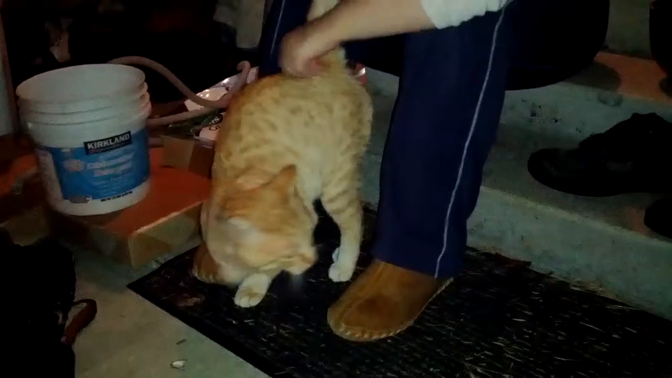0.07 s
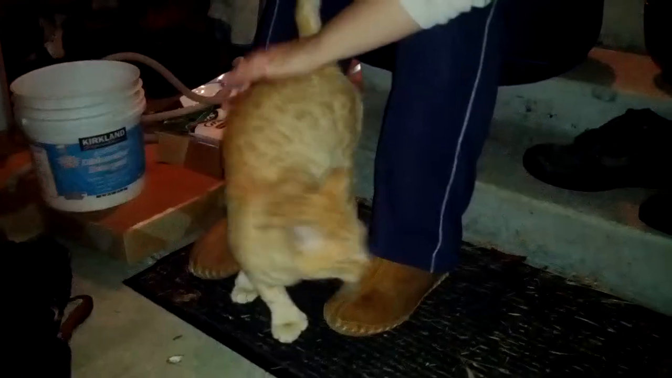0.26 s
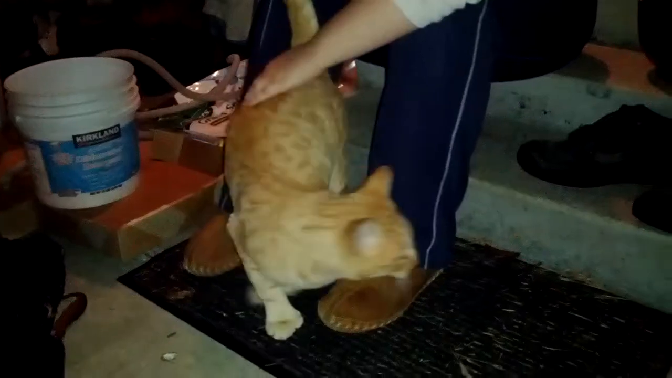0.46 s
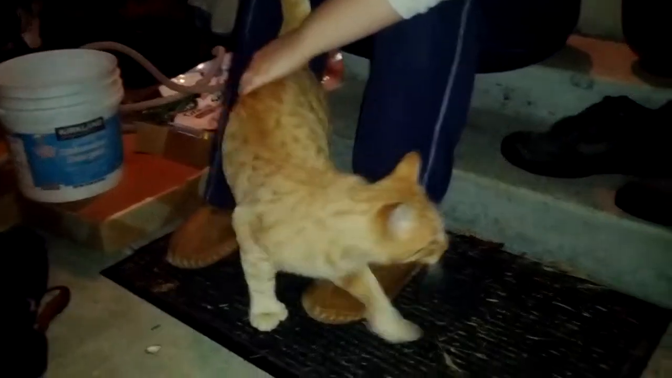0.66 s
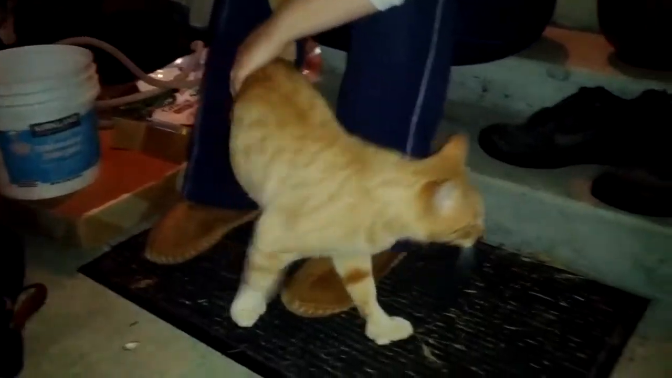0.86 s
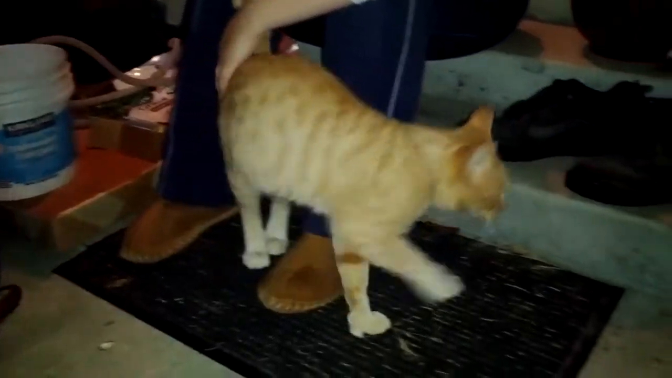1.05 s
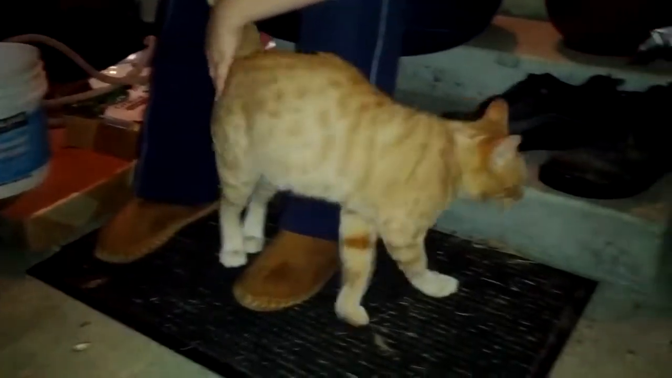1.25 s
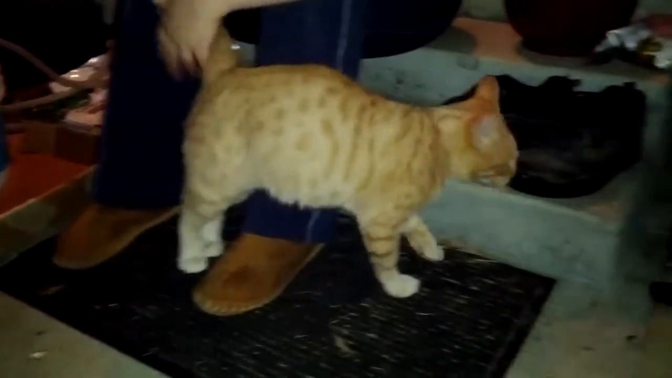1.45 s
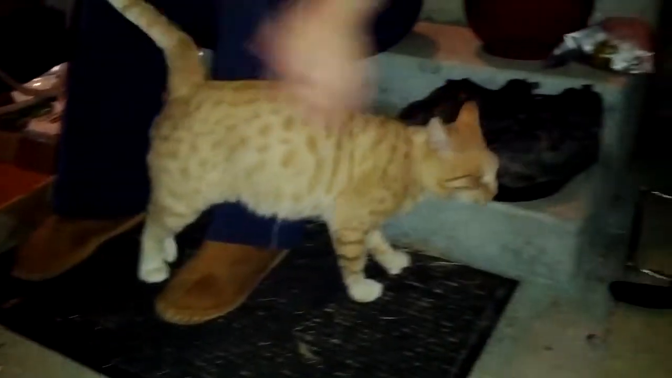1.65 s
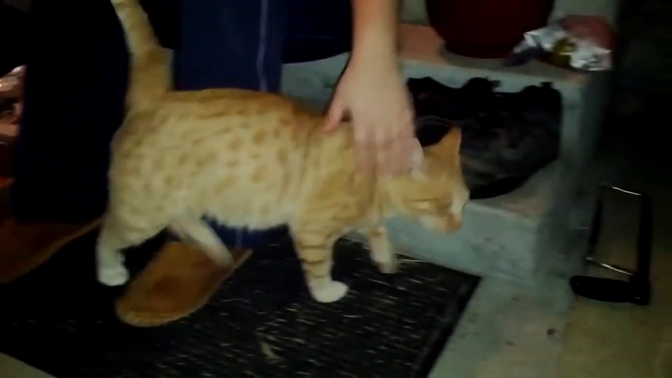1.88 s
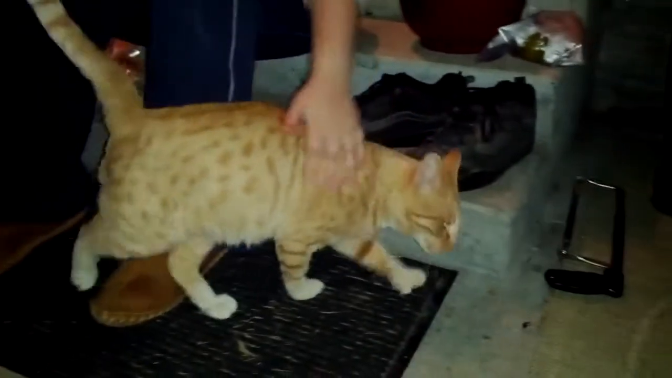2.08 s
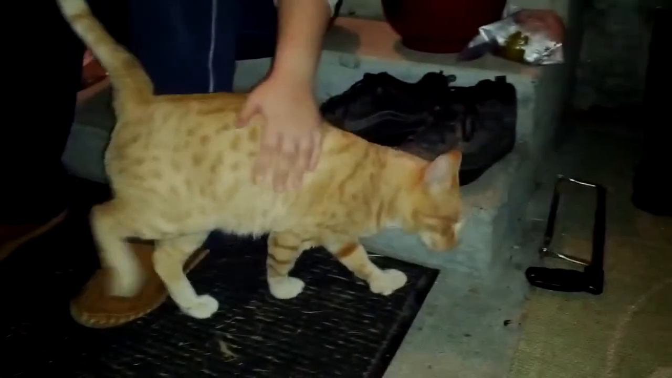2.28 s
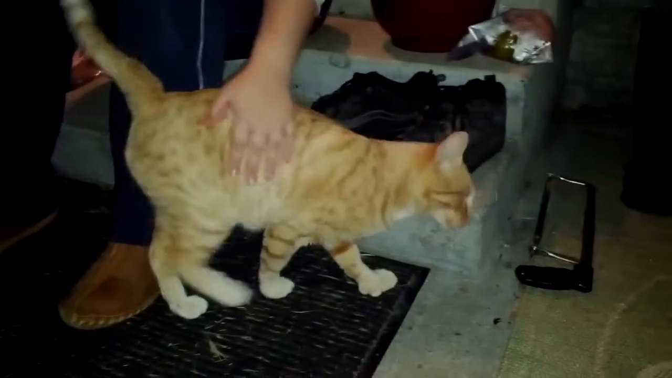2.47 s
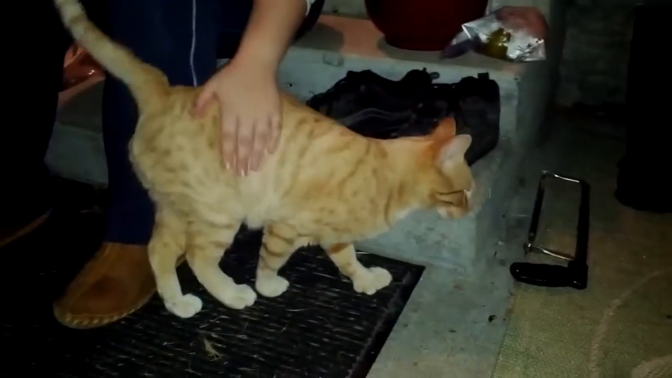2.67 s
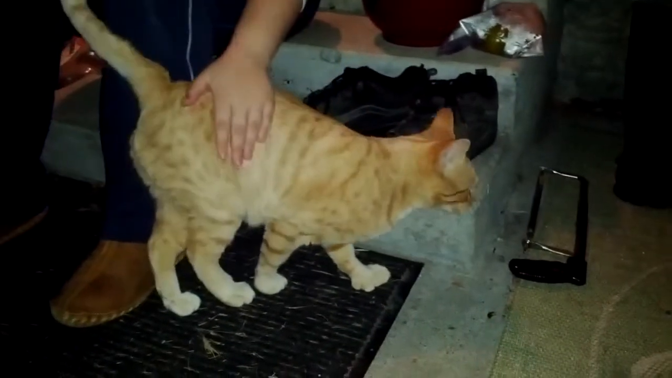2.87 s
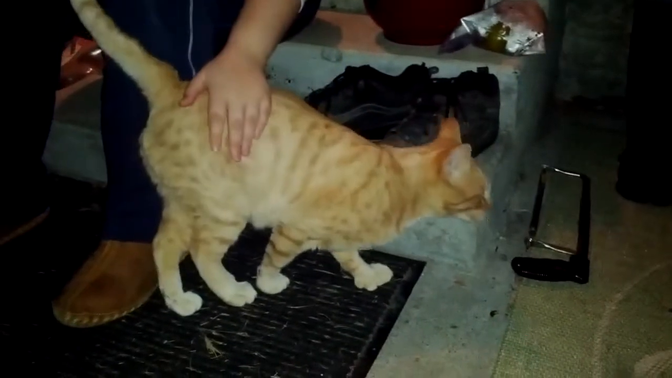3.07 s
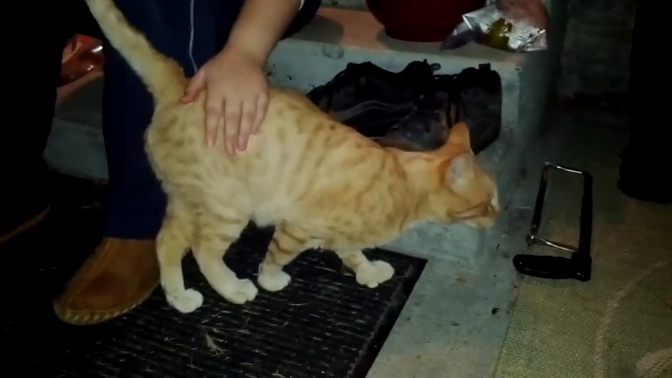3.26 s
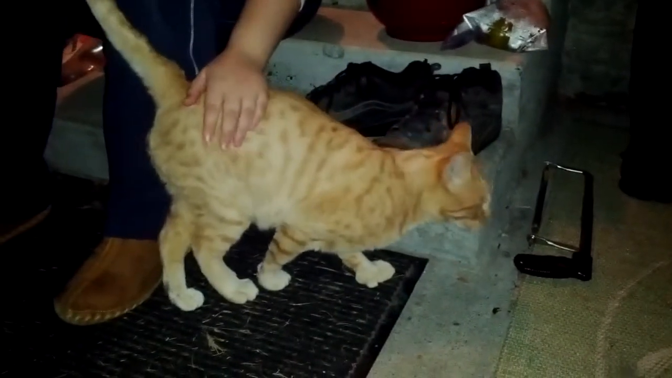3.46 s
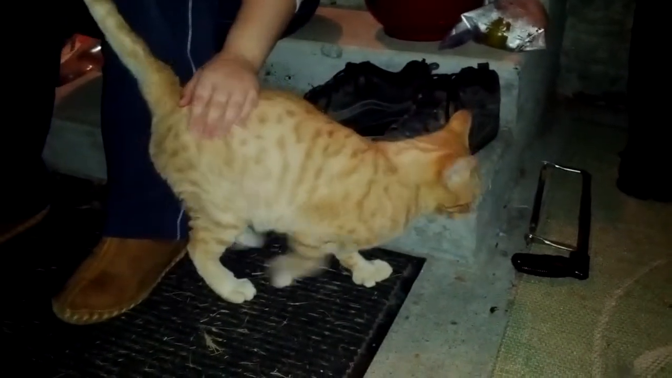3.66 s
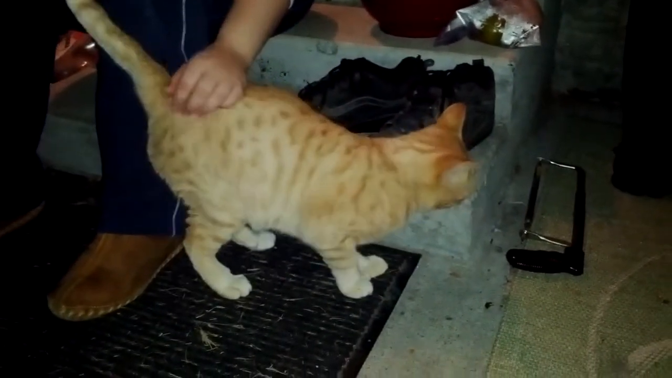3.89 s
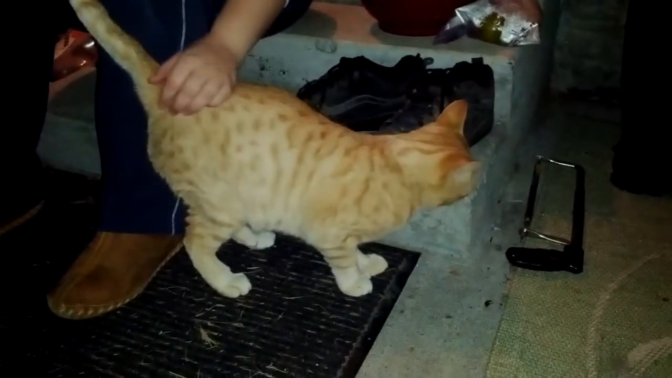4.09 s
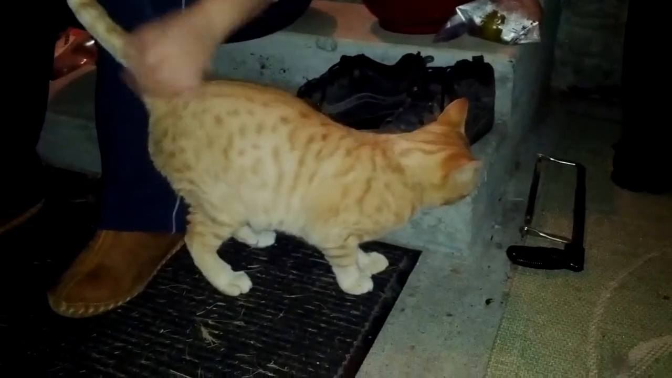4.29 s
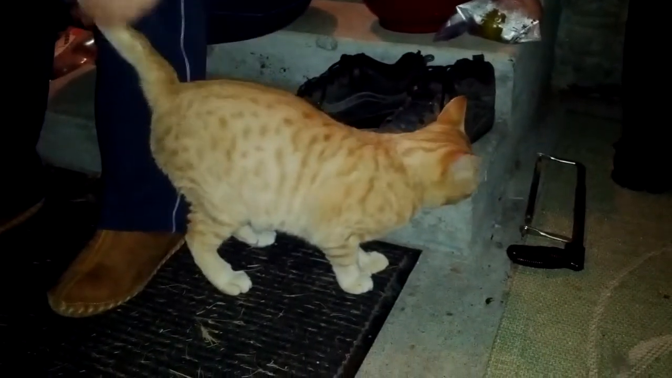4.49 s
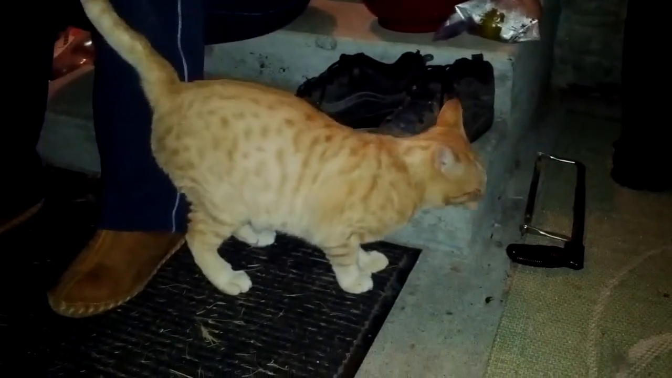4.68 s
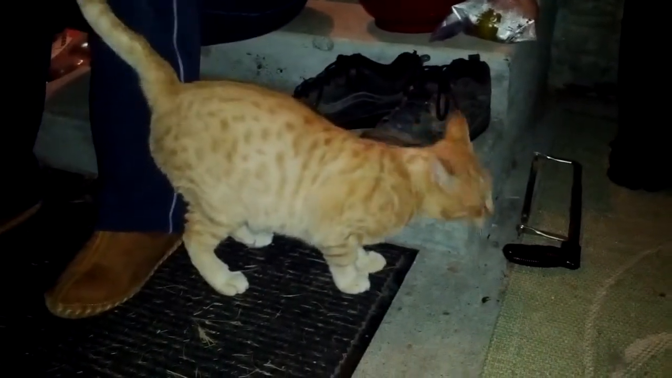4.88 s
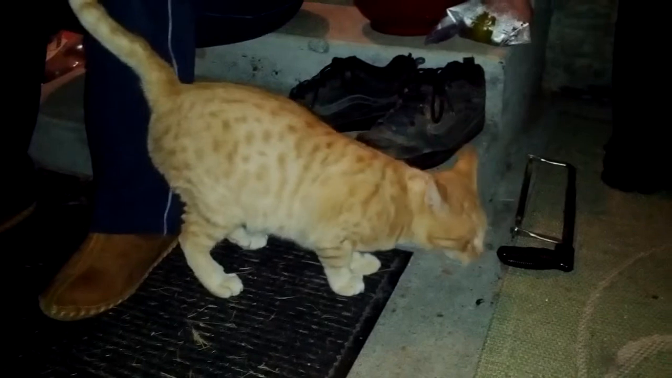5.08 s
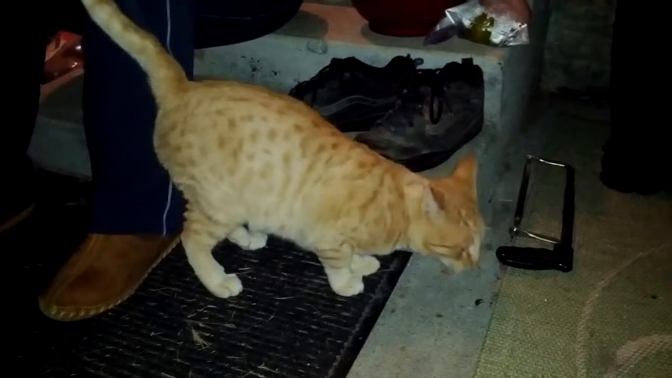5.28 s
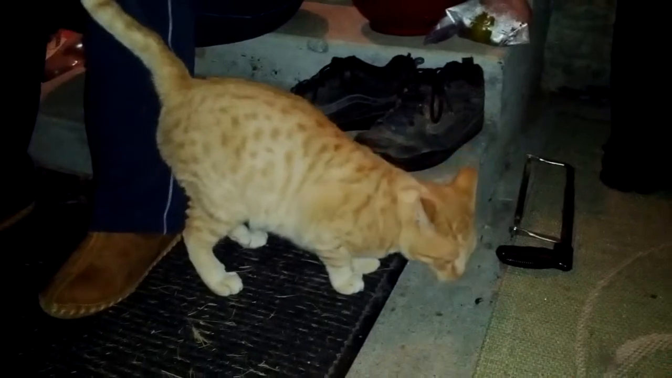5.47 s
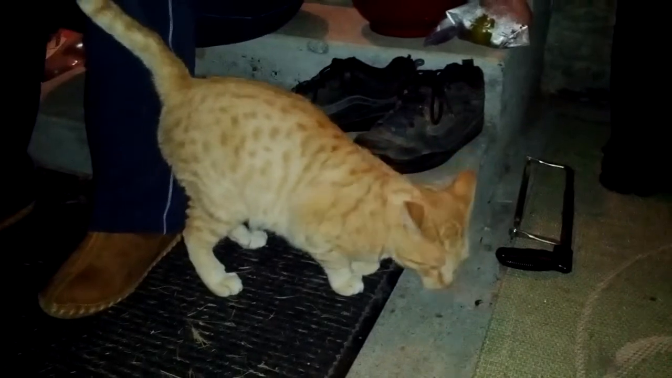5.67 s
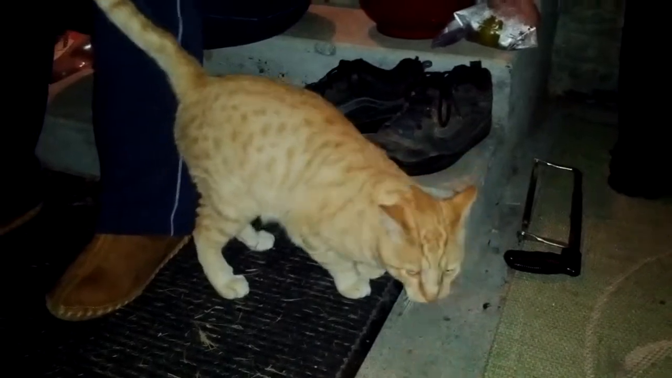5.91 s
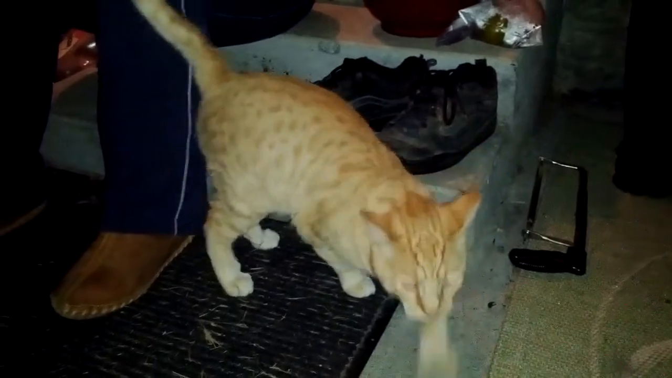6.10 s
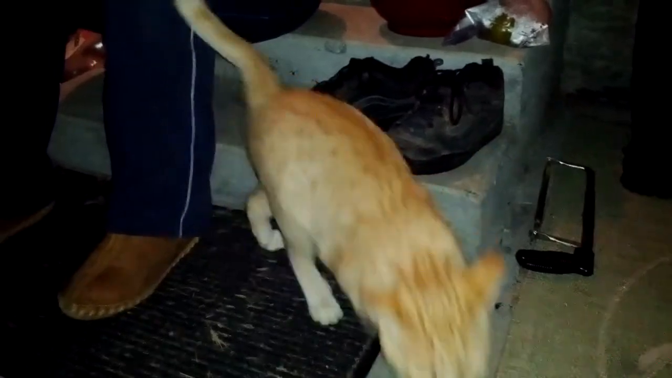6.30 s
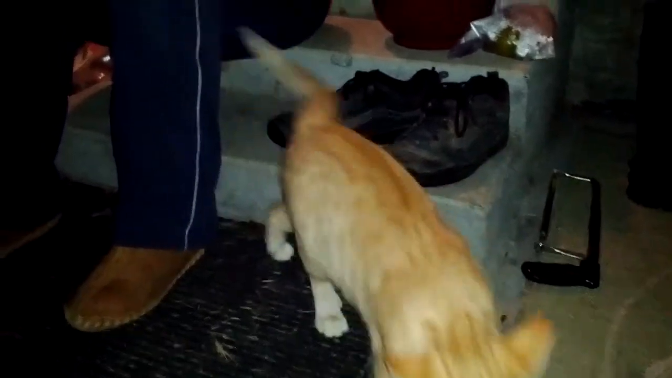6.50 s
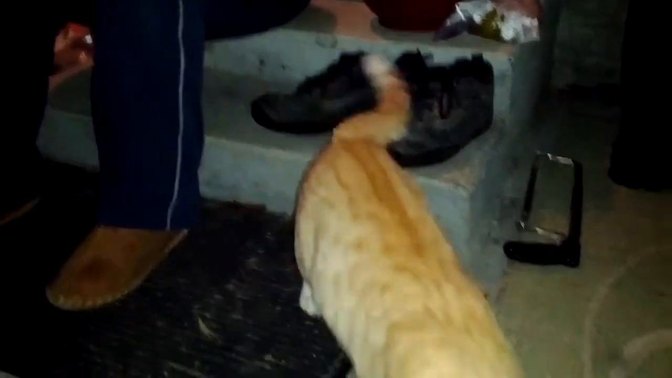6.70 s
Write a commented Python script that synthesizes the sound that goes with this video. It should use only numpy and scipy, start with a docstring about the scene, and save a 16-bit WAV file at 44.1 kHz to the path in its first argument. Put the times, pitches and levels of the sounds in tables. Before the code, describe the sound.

A throbbing engine swells past a hissy night patio, dropping in pitch as it fades, with sparse dry insect ticks and a final gritty paw step.

```python
"""Night on a patio. From the start the exhaust tones of an eight-cylinder vehicle approach, over filtered-noise
tyre roar, a noise hiss and steady whine; band-passed impulses make an insect tick at scattered moments.
The vehicle passes near 4 s: its tones lope, drop in pitch, and fade in and out with wall reflections.
As it recedes, a cat's paw crunches grit on the mat after 6.2 s: impulses and noise through band-passes."""
import sys
import numpy as np
from scipy import signal
from scipy.io import wavfile

SR = 44100
rng = np.random.default_rng(int(sys.argv[2]) if len(sys.argv) > 2 else 0)


def convert_level_to_amplitude(level_db):
    """Map a level in decibels to its linear amplitude factor."""
    exponent = np.asarray(level_db, float) / 20
    return 10 ** exponent


def file_out(sig):
    """Save sig as 16-bit WAV at sys.argv[1]."""
    # one column per channel
    cols = np.atleast_2d(sig).T
    # limit, then scale
    lim = np.clip(cols, -1, 1)
    pcm = np.round(lim * 32767).astype(np.int16)
    wavfile.write(sys.argv[1], SR, pcm)


N = 297398
T = np.arange(N) / SR   # time in seconds
SLOW_STEP = 40   # samples between values of a slow curve


def rms_one(x):
    """Normalisation: divide a signal by its root mean square."""
    return x / np.sqrt(np.mean(x ** 2) + 1e-20)


def in_time(rows):
    """Linear interpolation: each column after the time becomes a curve with one value a sample."""
    s, *columns = np.transpose(rows)
    return [np.interp(T, s, column) for column in columns]


def drift(corner_hz):
    """Low-pass random process: white noise through two equal real poles, scaled to unit rms."""
    pole = np.exp(-2 * np.pi * corner_hz * SLOW_STEP / SR)
    settling = 2000   # values dropped while the filter settles
    white = rng.standard_normal(N // SLOW_STEP + settling + 2)
    slow = signal.lfilter([1], [1, -2 * pole, pole * pole], white)
    return rms_one(slow[settling:])


def stretch(slow):
    """Upsampling by linear interpolation: a slow curve to one value a sample."""
    return np.interp(np.arange(N) / SLOW_STEP, np.arange(len(slow)), slow)


def band(x, low_hz, high_hz, order=2):
    """Causal Butterworth band-pass: an impulse sent through it rings briefly within the band."""
    sections = signal.butter(order, [low_hz, high_hz], "band", fs=SR, output="sos")
    return signal.sosfilt(sections, x)


def banded_noise(spectrum, slow_db, fast_db):
    """Spectral shaping: third-octave bands of noise, each with its own level and flicker; unit rms."""
    hz_points, db_points = np.transpose(spectrum)
    edges = 20 * 2 ** np.arange(0, 9.9, 1 / 3)
    white = rng.standard_normal((2, N))   # neighbouring bands take different noise
    out = 0
    for k, (low, high) in enumerate(zip(edges, edges[1:])):
        flicker = convert_level_to_amplitude(slow_db * drift(2.53) + fast_db * drift(5.1))
        log_centre = np.log(low * high) / 2
        level_db = np.interp(log_centre, np.log(hz_points), db_points, left=-99, right=-99)
        if level_db > -60:
            out = out + convert_level_to_amplitude(level_db) * stretch(flicker) * band(white[k % 2], low, high)
    return rms_one(out)


def hollow_tone(centre_hz, share_db, width_hz):
    """Resonance: noise passes twice through a two-pole filter whose centre moves in short steps."""
    white = rng.standard_normal(N)
    out = np.empty(N)
    radius = np.exp(-np.pi * width_hz / SR)
    state = np.zeros((2, 2))
    block = 256
    for i in range(0, N, block):
        turn = 2 * np.pi * centre_hz[i] / SR
        section = [1, 0, -1, 1, -2 * radius * np.cos(turn), radius * radius]
        out[i:i + block], state = signal.sosfilt([section, section], white[i:i + block], zi=state)
    return convert_level_to_amplitude(share_db) * rms_one(out)


def struck(times_s, peaks_db):
    """Impulsive excitation: a train of single-sample impulses."""
    out = np.full(N, 1e-18)
    out[np.round(np.asarray(times_s) * SR).astype(int)] = convert_level_to_amplitude(peaks_db)
    return out


# Engine cycles as heard, dropping by Doppler shift. Each row: time in seconds, cycles per second.
ENGINE_CYCLES = [(0.17, 14.624), (1.4, 14.622), (1.8, 14.653), (2.2, 14.632), (2.6, 14.593), (3.0, 14.561),
                 (3.4, 14.415), (3.8, 14.187), (4.2, 13.836), (4.6, 13.308), (5.0, 13.038), (5.4, 12.794),
                 (6.2, 12.792), (6.74, 12.767)]
# Firing tone, eight to a cycle, fading where reflections cancel it. Each row: time in seconds, level in dB.
FIRING_TONE = [(0.17, -39.5), (0.55, -39.5), (1.05, -33), (1.6, -27), (1.92, -27), (2.1, -24.5),
               (2.35, -25.5), (2.78, -19), (2.93, -23), (3.1, -19), (3.3, -24), (3.43, -21.5), (3.75, -30),
               (3.9, -27.5), (4.15, -33), (4.5, -35), (4.62, -26.5), (4.72, -27.5), (4.86, -33.5),
               (5.05, -29), (5.9, -35), (6.2, -38), (6.74, -39.5)]
# Fainter exhaust tones. Each row: time in seconds, seventh multiple in dB, ninth multiple in dB,
# low throb in dB, overtones in dB.
LOPE_TONES = [(0.17, -48, -68, -62, -73), (1.1, -42.5, -62, -50, -65.5), (1.5, -44, -52, -50.5, -58.5),
              (2.0, -39.5, -53, -48, -62), (2.45, -35, -55, -46, -46), (3.1, -40, -36.5, -66, -50),
              (3.45, -51, -40, -41, -52.5), (3.9, -55, -57, -42, -45.5), (4.15, -45, -57, -45, -51),
              (4.65, -55, -50, -49, -56.5), (5.2, -40, -67, -58, -63), (5.65, -59, -54, -55, -64),
              (6.1, -53, -61, -71, -60.5), (6.74, -47, -60, -66, -63.5)]
# Tones of the low throb. Each row: multiple of the cycle rate, level in dB against the throb.
THROB_ORDERS = [(3, -10), (5, -3), (6, -23), (11, -21), (13, -6)]
# Overtones. Each row: multiple of the cycle rate, starting level in dB against the overtone column,
# change in dB per second.
OVERTONE_ORDERS = [(15, 5, -2), (16, -4, 1), (17, -20, -0.9)]
# A wall reflection cancels the firing tone, which returns in opposite phase. Each row: time in seconds,
# half-width in seconds, approximate share of amplitude left in the gap.
REFLECTION_GAPS = [(4.03, 0.1, .05), (4.39, 0.037, 0.3), (5.37, 0.28, 0.052), (6.35, 0.013, 0.22)]


def exhaust():
    """Harmonic series and beats: uneven firing sounds multiples of the cycle rate; neighbours beat as a lope."""
    cycles_per_s, = in_time(ENGINE_CYCLES)
    firing_db, = in_time(FIRING_TONE)
    seventh_db, ninth_db, throb_db, overtones_db = in_time(LOPE_TONES)
    tones = [(7, seventh_db), (9, ninth_db)]
    for order, db in THROB_ORDERS:
        tones.append((order, throb_db + db + stretch(0.83 * drift(1.7))))
    for order, db, db_per_s in OVERTONE_ORDERS:
        tones.append((order, overtones_db + db + db_per_s * T + stretch(2.1 * drift(1.2))))
    phase = 2 * np.pi * (np.cumsum(cycles_per_s) / SR + 0.465)
    phase = phase + stretch(0.02 * drift(4.7))   # radians: firing is never quite even
    firing = convert_level_to_amplitude(firing_db) * np.exp(8j * phase)
    for s, width_s, left in REFLECTION_GAPS:
        through_zero = np.tanh((s - T) / width_s)   # from +1 to -1
        firing = firing * (through_zero + 1j * left) / (1 + 1j * left)
    fainter = sum(convert_level_to_amplitude(db) * np.sin(round(order) * phase) for order, db in tones)
    return np.sqrt(2) * (firing.imag + fainter)


def shudder():
    """Low-frequency ground motion: band-passed noise rises steadily and swells as the vehicle passes."""
    start_db, rise_db_per_s = -56, 0.84
    swell_db, passing_s, half_width_s = 12, 3.9, 0.53
    nearness = np.exp(-((T - passing_s) / half_width_s) ** 2)
    level_db = start_db + rise_db_per_s * T + swell_db * nearness
    return convert_level_to_amplitude(level_db) * rms_one(band(rng.standard_normal(N), 27, 100))


# Rolling noise. Each row: time in seconds, body rumble in dB before a 5 dB lift,
# tyre roar in dB before a 3 dB cut, tread hiss in dB.
ROLLING = [(0.3, -57, -51.5, -69.5), (0.95, -52, -45.5, -70), (1.4, -52.5, -45, -65.5),
           (1.85, -52, -42, -58.5), (2.3, -45, -41.5, -60.5), (2.85, -41.5, -41, -59),
           (3.3, -43, -39.5, -57.5), (3.65, -42, -38, -55), (4.05, -43, -40, -56.5),
           (4.4, -42.5, -37.5, -58), (4.7, -49.5, -40.5, -59), (5.25, -53.5, -42.5, -68),
           (5.7, -55, -45, -70.5), (6.74, -59, -46.5, -69)]
# Spectrum of the body rumble. Each row: frequency in Hz, relative density in dB per Hz.
RUMBLE_SPECTRUM = [(55, -54), (80, 9.5), (160, 0), (220, -2.5), (285, -7), (355, -4), (450, -4), (560, -3),
                   (720, -8), (900, -45)]
# Breathy drone in the rumble. Each row: time in seconds, centre in Hz, level in dB against the rumble noise.
RUMBLE_DRONE = [(.3, 367, -7), (1.3, 350, -12), (2.2, 370, -9), (3.2, 341, -28), (4.4, 348, -13),
                (5, 314, -22)]
# Spectrum of the tyre roar. Each row: frequency in Hz, relative density in dB per Hz.
ROAR_SPECTRUM = [(360, -30), (620, -15), (756, -2), (1050, -5), (1220, -5.5), (1330, -7), (2440, -20.5),
                 (3020, -25), (3600, -29.5), (4680, -70), (7920, -120)]
# Two hollow tones in the tyre roar. Each row: time in seconds, lower centre in Hz, lower level in dB,
# upper centre in Hz, upper level in dB, both levels against the roar noise.
HOLLOW_TONES = [(0.3, 754, -2, 950, -8), (1.05, 814, 1, 835, -6), (1.7, 713, 0.5, 920, -3.5),
                (2.2, 678, 6, 915, -4.5), (3.1, 763, -4.5, 895, 1.5), (3.45, 604, 0.5, 900, -3),
                (3.8, 763, -1.5, 940, -10), (4.4, 764, -0.5, 950, -23), (5.2, 778, -10.5, 950, -11),
                (5.9, 760, -11, 1040, -7.5), (6.74, 730, -5.5, 980, -11)]
# Spectrum of the tread hiss. Each row: frequency in Hz, relative density in dB per Hz.
TREAD_SPECTRUM = [(1530, -41), (2600, -4.5), (3010, -3.5), (3340, -8.5), (4420, -9), (7920, -9.5),
                  (12000, -22), (15600, -42), (22000, -120)]


def road():
    """Broadband rolling noise: body rumble, tyre roar and tread hiss swell and brighten with nearness."""
    rumble_db, roar_db, tread_db = in_time(ROLLING)
    drone = hollow_tone(*in_time(RUMBLE_DRONE), width_hz=53)
    rumble = banded_noise(RUMBLE_SPECTRUM, slow_db=-0.5, fast_db=-0.94) + drone
    low_hz, low_db, high_hz, high_db = in_time(HOLLOW_TONES)
    hollow = hollow_tone(low_hz, low_db, width_hz=193) + hollow_tone(high_hz, high_db, width_hz=234)
    roar = banded_noise(ROAR_SPECTRUM, slow_db=1.12, fast_db=0.5) + hollow
    tread = banded_noise(TREAD_SPECTRUM, slow_db=0.3, fast_db=0.3)
    return convert_level_to_amplitude(rumble_db + 5) * rumble + convert_level_to_amplitude(roar_db - 3) * roar + convert_level_to_amplitude(tread_db) * tread


# Spectrum of the microphone hiss. Each row: frequency in Hz, relative density in dB per Hz.
HISS_SPECTRUM = [(2060, -23), (3500, -11), (4070, -19), (4560, -10.5), (6290, -3.5), (7000, -7), (8250, 1),
                 (9540, -1), (11000, -9.5), (11700, 6), (15800, -9)]


def microphone_hiss():
    """Stationary noise: a shaped spectrum at -64 dB rms, each band flickering slightly."""
    return convert_level_to_amplitude(-64) * banded_noise(HISS_SPECTRUM, slow_db=0.15, fast_db=0.3)


# Thin steady tones of the electronics. Each row: frequency in Hz, rms level in dB.
WHINE_TONES = [(6075, -89), (12150, -93)]


def electronic_whine():
    """Pure tones: steady sinusoids, the second at twice the frequency of the first."""
    return sum(np.sqrt(2) * convert_level_to_amplitude(db) * np.sin(2 * np.pi * hz * T) for hz, db in WHINE_TONES)


# Ticks of the insect. Each row: time in seconds, nominal peak in dB before the impulse gain.
INSECT_TICKS = [(.782, -51), (1.7585, -55), (2.326, -38.5), (3.6416, -50), (4.79, -47), (4.8336, -50),
                (4.8376, -40), (4.8701, -39), (4.9036, -39)]


def insect():
    """Impulse response and echo: each dry treble tick has a fainter, inverted echo off the paving."""
    s, peak_db = np.transpose(INSECT_TICKS)
    echo_delay_s = 0.00045
    direct = struck(s, peak_db + 19)
    echo = struck(s + echo_delay_s, peak_db + 10)
    return band(direct - echo, 6200, 11000, order=3)


# Loudest cracks of grit under a paw. Each row: time in seconds, bright part in dB, dull part in dB,
# both before the impulse gains.
GRIT_CRACKS = [(6.2525, -45, -55), (6.2739, -46, -60), (6.3102, -48, -60), (6.3462, -45, -46),
               (6.3614, -42, -51), (6.3688, -45, -56), (6.412, -40, -45), (6.4209, -41, -49),
               (6.4248, -26, -31), (6.4256, -25, -29), (6.4354, -42, -53)]
# Density of the finer grit. Each row: time in seconds, mean cracks per second.
FINE_GRIT = [(6.22, 0), (6.26, 300), (6.36, 400), (6.4, 1800), (6.435, 1800), (6.48, 0)]
# Soft thud of the paw. The one row: time in seconds, impulse level in dB, low edge in Hz, high edge in Hz.
THUD = (6.343, 9, 77, 183)


def paw():
    """Random impulses and resonance: bright and dull cracks among finer crackle, with one soft thud."""
    s, bright_db, dull_db = np.transpose(GRIT_CRACKS)
    cracks_per_s, = in_time(FINE_GRIT)
    fires = rng.random(N) < cracks_per_s / SR
    fine = fires * rng.standard_normal(N) * convert_level_to_amplitude(-43.5)
    bright = band(fine + struck(s, bright_db + 10), 6200, 13400)
    ringing = band(struck(s, bright_db + 13), 8700, 10000)
    dull = band(struck(s, dull_db + 20), 2300, 5000)
    thud_s, thud_db, low_hz, high_hz = THUD
    thud = band(struck([thud_s], thud_db), low_hz, high_hz)
    return bright + ringing + dull + thud


def scene():
    """Superposition: vehicle, insect and paw add linearly in one channel."""
    return (exhaust() + shudder() + road() + insect() + paw())[None]


def low_pass(x):
    """Removes everything above the highest recorded frequency."""
    return signal.sosfilt(signal.butter(12, 16110, fs=SR, output="sos"), x)


def record(dry):
    """Band limiting: hiss and whine join in, a steep low-pass cuts the top, a short silence comes first."""
    silence_s = 0.1686
    top_cut = signal.ellip(12, 0.5, 70, 15720, fs=SR, output="sos")   # order, ripple dB, stop dB, edge Hz
    mixed = dry + microphone_hiss() + electronic_whine()
    heard = signal.sosfilt(top_cut, mixed) * (T >= silence_s)
    return low_pass(heard)


dry = scene()
out = record(dry)
file_out(out)
```